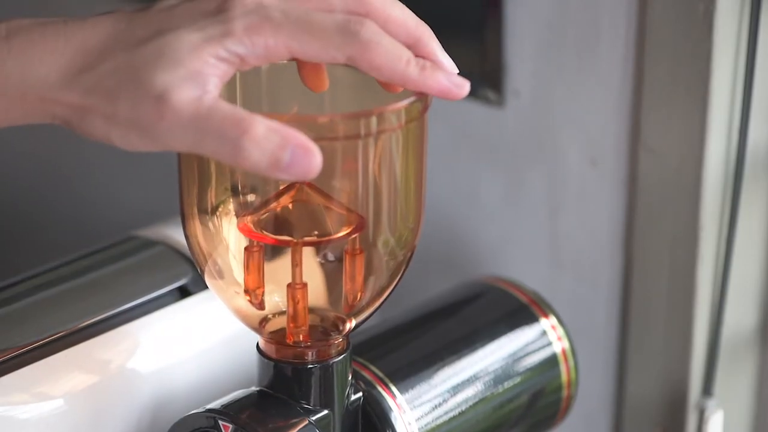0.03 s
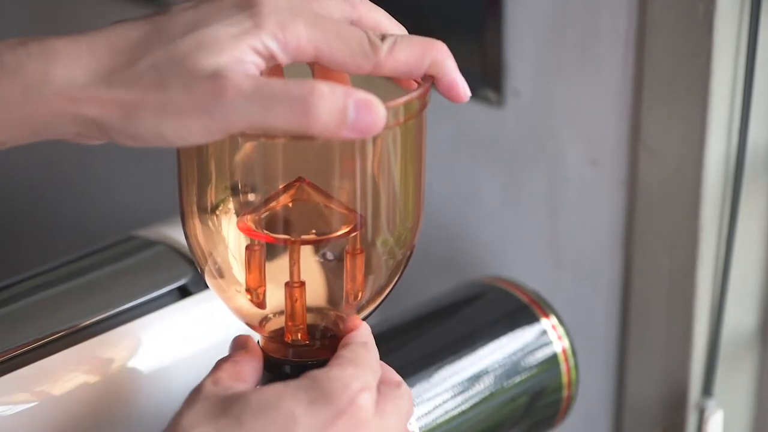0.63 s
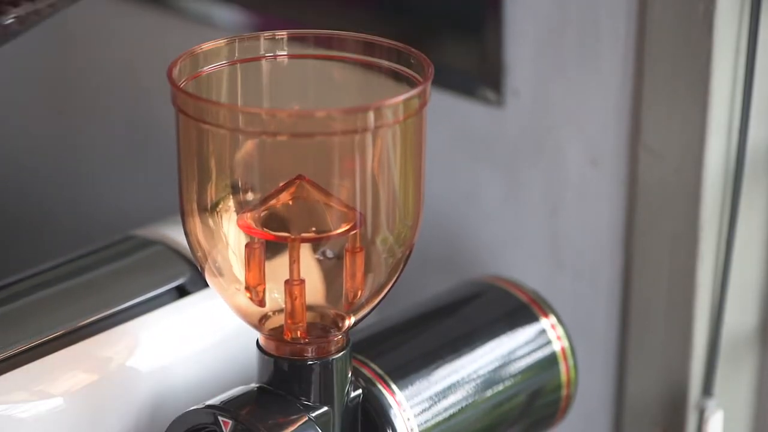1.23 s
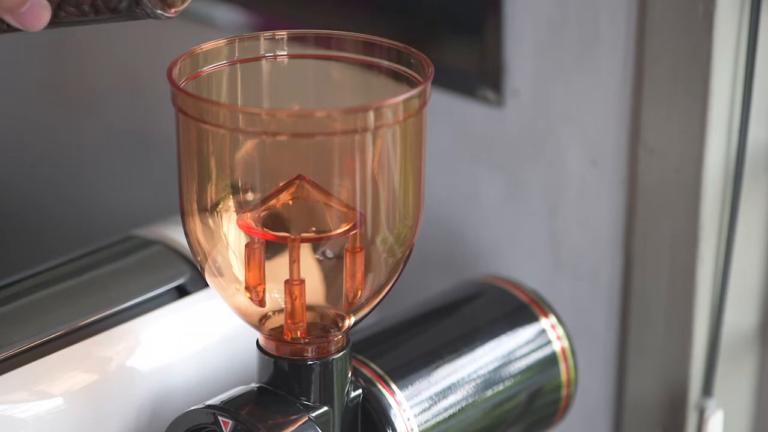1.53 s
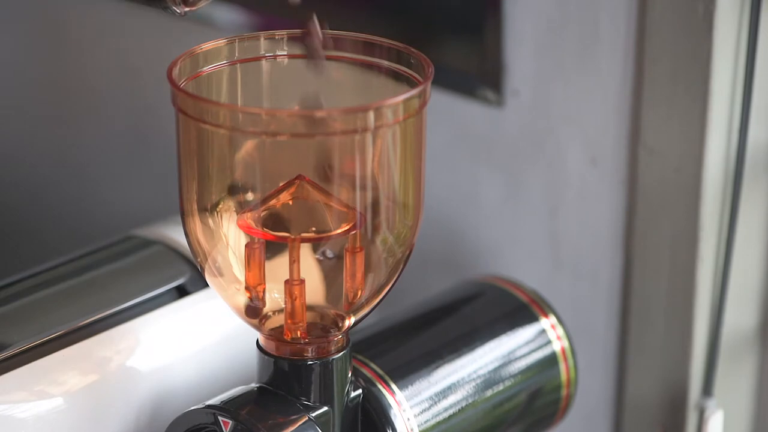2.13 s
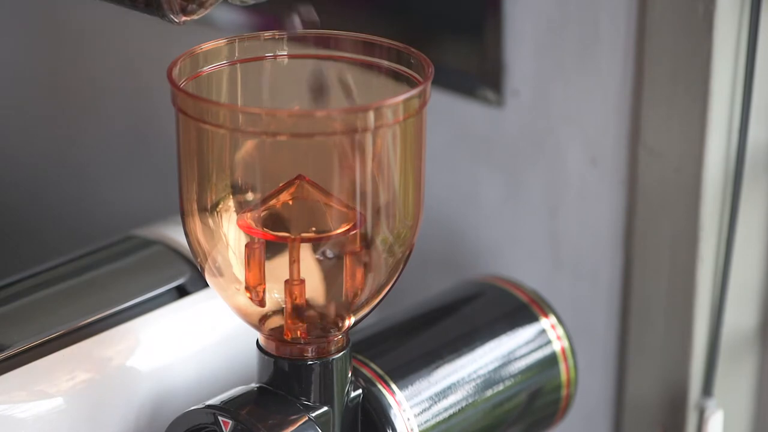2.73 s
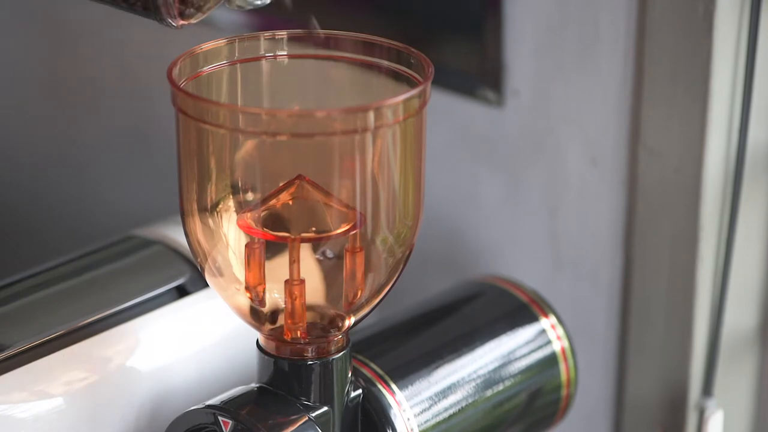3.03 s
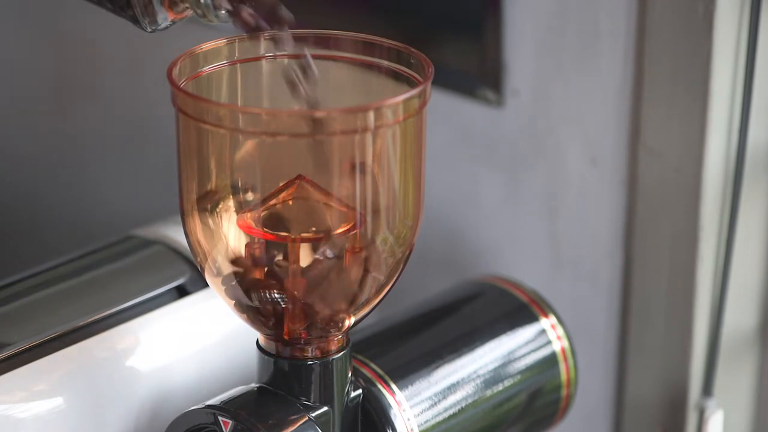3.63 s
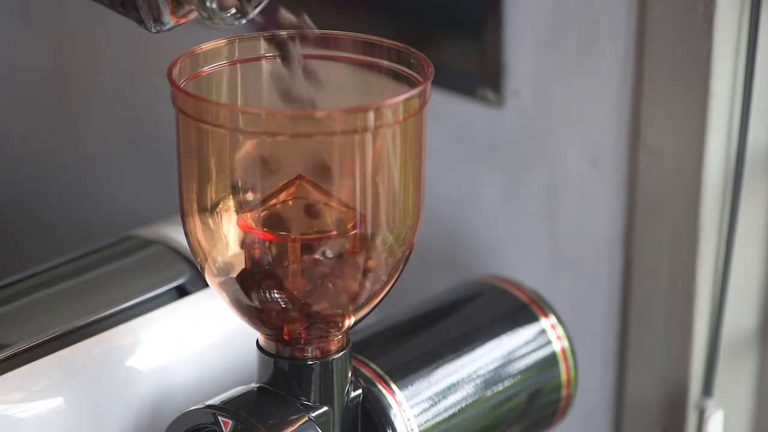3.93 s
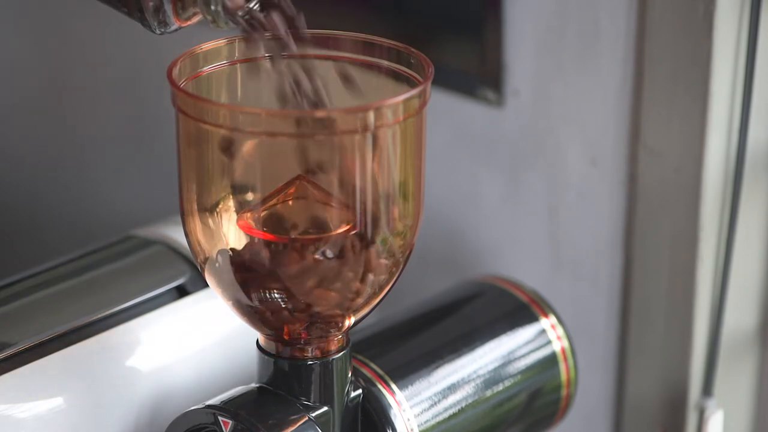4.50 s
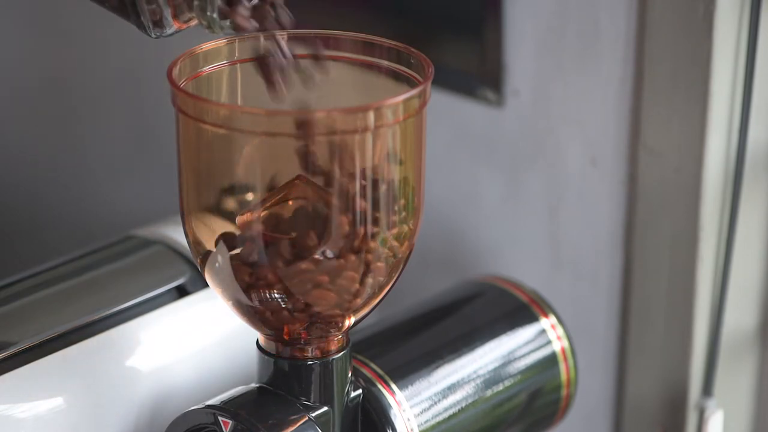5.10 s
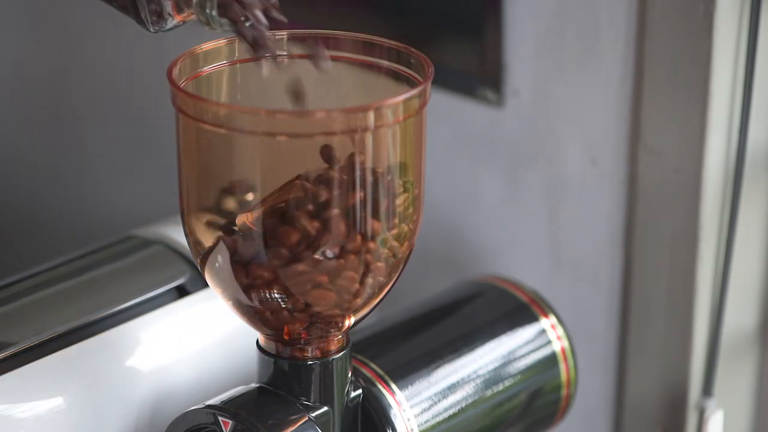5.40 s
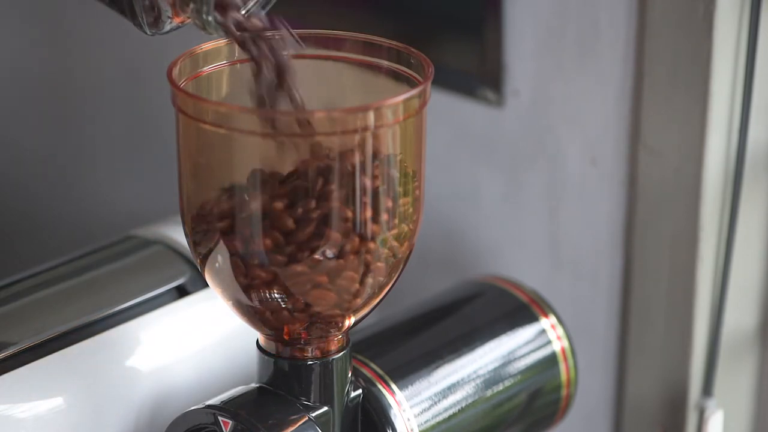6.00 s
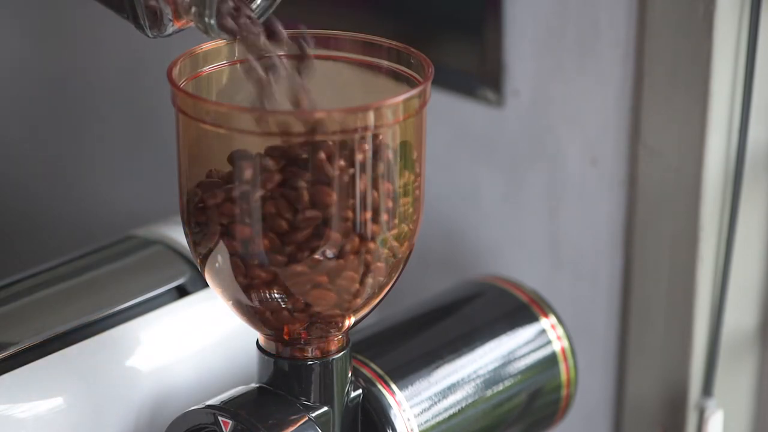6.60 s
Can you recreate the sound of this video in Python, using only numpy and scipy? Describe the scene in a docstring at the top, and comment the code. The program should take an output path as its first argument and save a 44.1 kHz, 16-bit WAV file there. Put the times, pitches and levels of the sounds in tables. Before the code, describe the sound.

After a tap and a few glassy clinks, coffee beans clatter into a plastic grinder hopper, easing to a softer patter.

```python
"""Coffee beans poured into a grinder

Beans slide along a tilted glass jar and pour into a plastic hopper, close by in a small room.
Their impacts first excite the modes of the bare wall; the growing heap damps those modes, and the
beans land softly on each other. Before the pour, hands steady and tap the hopper,
and a low rumble stops short together with a hiss."""
import sys
import numpy as np
from scipy import signal
from scipy.fft import rfft, irfft
from scipy.io import wavfile
from scipy.ndimage import uniform_filter1d

SR = 44100
rng = np.random.default_rng(int(sys.argv[2]) if len(sys.argv) > 2 else 0)


def transcribe(u):
    """Save the signal u as a 16-bit wav file named by the first command-line argument.

    u: samples, shape (n,) or (channels, n), limited to [-1, 1]; the rate is SR.
    q: integer samples, one column per channel.
    """
    v = np.clip(np.atleast_2d(u).T, -1, 1)
    q = np.round(v * 32767).astype(np.int16)
    wavfile.write(sys.argv[1], SR, q)


N = 297675
TIME = np.arange(N) / SR
BEAN_HZ = 5600  # usual pitch of a bean
HISS_END_S = 1.118


def pour(cushion_db=-6, heap_db=2):
    """Energy partition: as the hopper fills, the heap takes a growing share of the blows from the wall."""
    # Flow on a bare wall: a spill, a stall, the main pour. Each row: time in seconds, level in dB.
    flow = [(2.02, -26), (2.11, -30), (2.16, -17.5), (2.82, -17.5), (3.05, -30.5), (3.2, -12), (3.38, -15),
            (3.62, -15.5), (3.71, -19), (3.85, -15.5), (3.96, -26.5), (4.02, -18), (4.35, -16),
            (4.62, -17.5), (4.73, -20.5), (5.07, -19.5), (5.46, -25), (5.6, -21), (5.8, -21), (5.93, -24.5),
            (6.1, -22), (6.57, -27), (6.75, -38)]
    # Spectrum of a bean striking other beans. Each row: frequency in Hz, level in dB.
    on_heap = [(100, -36), (600, -25.5), (1050, -16), (1400, -8), (2000, -4.5), (2500, -6.5), (3100, 1),
               (4000, -3.5), (5000, 0), (6500, 0.5), (8500, -2.5), (10500, -3), (13000, -6.5),
               (16000, -13.5)]
    heap_share = np.interp(TIME, (4.4, 6.37), (0.073, 0.99))
    # beans fall less far and land softer on a full heap
    blows = falling_beans(follow(flow, -120) + cushion_db * heap_share)
    wall = hopper_wall(blows * np.sqrt(1 - heap_share))
    return wall + gain_of(heap_db) * through(blows * np.sqrt(heap_share), click(on_heap))


def hopper_wall(blows, bare_db=-4, buried_db=-5.5, flex_db=-42, click_db=-2):
    """Modal damping: beans resting against the wall widen its resonances and deaden its ring."""
    # Modes of the bare wall, the half-buried wall and the whole hopper flexing on its seat.
    # Each row: frequency in Hz, bandwidth in Hz, level in dB.
    bare_modes = [(1610, 35.4, -0.5), (1973, 61, 2), (2628, 32, -4), (2995, 77, 0.5), (3400, 58, 2.5),
                  (3793, 98, -1), (4220, 160, -4.5), (4480, 56, 2), (4300, 39, -10), (4725, 144, 2.5),
                  (5272, 164, 0.5), (5310, 110, -19), (5620, 44, 3), (5850, 220, -1.5), (5900, 88, -8.5),
                  (6140, 32, 6), (6210, 126, 2), (6450, 18, 3), (6500, 52, -18), (7040, 150, -13.5),
                  (7460, 150, -18)]
    buried_modes = [(1750, 130, -14.5), (1950, 62, 0), (2080, 78, 1), (3020, 16, 7.5), (3720, 77, -1.5),
                    (4320, 90, -21), (4640, 310, -2.5), (5250, 560, -2.5), (5750, 290, -10),
                    (6200, 260, -0.5), (6940, 350, -16), (10100, 170, -33)]
    flex_modes = [(480, 42, 3), (810, 37, -4)]
    # Spectrum of a bean striking plastic. Each row: frequency in Hz, level in dB.
    on_wall = [(100, -42), (500, -25), (1100, -56), (1500, -14), (2400, -26), (3500, -20), (4500, 0.5),
               (6400, -12), (8200, -16.5), (10500, -10.5), (13000, -22.5), (16000, -32)]
    buried = np.interp(TIME, (3.82, 5.24), (0.028, 0.92))
    bare = gain_of(bare_db) * through(blows * (1 - buried), ring(bare_modes, low_hz=1570))
    damped = gain_of(buried_db) * through(blows * buried, ring(buried_modes, low_hz=1320))
    flex = gain_of(flex_db) * through(blows, ring(flex_modes, low_hz=300))
    return bare + damped + flex + gain_of(click_db) * through(blows, click(on_wall))


def falling_beans(flow_db, stream_db=-2, extra_lull_db=-2, hard_lull_db=-4):
    """Granular flow: beans fall in bunches, so the stream thins just before each strong landing."""
    # Single beans that land hard. Each row: start in seconds, relative level in dB, pitch in Hz.
    hard = [(1.9805, -27, 5400), (2.0143, -17, 5240), (2.0277, -20, 5250), (2.0416, -23.5, 6060),
            (2.0774, -19, 5570), (2.11, -17, 4770), (2.1344, -15, 5660), (2.32, -17.5, 5030),
            (2.397, -19, 5540), (2.4348, -17.5, 5800), (2.8335, -15.5, 4700), (2.9327, -17.5, 5850),
            (2.9553, -17, 5310), (2.9692, -20, 6200), (3.0008, -22.5, 6140), (3.0856, -19, 6000),
            (3.1124, -18.5, 6030), (3.2235, -15, 5750), (3.5725, -15.5, 6200), (3.8091, -19.5, 5200),
            (3.9413, -17.5, 5400), (3.9886, -16, 6100), (4.1472, -13.5, 5900), (4.1813, -13.5, 5100),
            (4.6853, -18, 5800), (4.778, -22, 4800), (4.9615, -18, 5200), (5.057, -18.5, 5260),
            (5.078, -25, 4870), (5.1702, -24, 5300), (5.4584, -25.5, 5990), (5.4908, -25, 5600),
            (5.5675, -23, 5000), (5.65, -25, 4870), (5.763, -20, 5010), (5.829, -21, 5900),
            (6.0355, -21.5, 4930), (6.2035, -24.5, 6090), (6.3771, -26, 5810), (6.5315, -28.5, 5760),
            (6.5485, -26.5, 5830), (6.6932, -37.5, 6160)]
    rattle = stream(2, N / SR, spread_db=0, pitch_hz=BEAN_HZ, scatter=0.19, steady_s=0.012, count=3200)
    extra = extra_landings(flow_db)
    flow = gain_of(stream_db + flow_db + extra_lull_db * lulls(extra)) * rattle + landings(extra)
    return flow * gain_of(hard_lull_db * lulls(hard)) + landings(hard)


def beans(s, strength, pitch_hz, ring_db=8, scatter_s=0.0026, scatter_db=-12,
          chatter_s=0.003, rebound=0.87, width_hz=800, size=512, count=3):
    """Contact chatter: each bean touches several times within milliseconds and rings at its own pitch."""
    hz = np.fft.rfftfreq(size, 1 / SR)
    chance = rng.random((len(s), count, 2))
    delay = chatter_s * chance[:, :, 0] * (np.arange(count) > 0)
    force = np.sign(chance[:, :, 1] - .5) * rebound ** np.arange(count)
    contacts = sum(force[:, [k]] * np.exp(-2j * np.pi * hz * delay[:, [k]]) for k in range(count))
    # each bean's sound echoes around the vessel along its own paths
    echoes = rng.standard_normal((len(s), size)) * np.exp(-np.arange(size) / SR / scatter_s)
    paths = 1 + gain_of(scatter_db) * rfft(echoes)
    resonance = 1j * hz * width_hz / (pitch_hz[:, None] ** 2 - hz ** 2 + 1j * hz * width_hz)
    grains = irfft(contacts * paths * (1 + gain_of(ring_db) * resonance), size)
    grains *= (strength / np.linalg.norm(grains, axis=1))[:, None]
    at = np.round(s * SR).astype(int)[:, None] + np.arange(size)
    return np.bincount(at.ravel(), grains.ravel(), N)[:N]


def stream(start, end, spread_db, pitch_hz, scatter, steady_s, count):
    """Shot noise: beans arrive at random, their sum held near rms 1 over the span steady_s."""
    s = start + rng.random(count) * (end - start)
    strength = gain_of(spread_db * np.clip(rng.standard_normal(count), -2, 2))
    rattle = beans(s, strength, pitch_hz * np.exp(scatter * rng.standard_normal(count)))
    span = int(steady_s * SR)
    power = uniform_filter1d(uniform_filter1d(rattle ** 2, span), span)
    return rattle / np.sqrt(abs(power) + np.mean(rattle ** 2) / 20)


def landings(rows, landing_db=23, spray_db=-9, spray_s=0.026, fade_db=12, detune=0.39, count=5):
    """Momentum transfer: a hard landing knocks other beans loose in a short, fading spray."""
    s, db, pitch_hz = np.transpose(rows)
    jitter, pitch_draw = rng.random((len(s), count, 2)).T
    lag = (np.arange(count)[:, None] + .5 + jitter) / count
    spray_hz = pitch_hz * np.exp(detune * (2 * pitch_draw - 1))
    strength = gain_of(db + spray_db - fade_db * lag)
    spray = beans((s + spray_s * lag).ravel(), strength.ravel(), spray_hz.ravel())
    return gain_of(landing_db) * (beans(s, gain_of(db), pitch_hz) + spray)


def extra_landings(flow_db, start=2.15, per_s=36, level_db=-2.5, spread_db=1):
    """Further hard landings at chance times: rows (s, dB, Hz), as hard as the flow is strong."""
    count = int((N / SR - start) * per_s)
    jitter, size, pitch = rng.uniform(-1, 1, (count, 3)).T
    s = start + (np.arange(count) + (1 + jitter) / 2) / per_s
    db = np.interp(s, TIME, flow_db) + level_db + spread_db * size
    return np.transpose([s, db, BEAN_HZ * np.exp(.12 * pitch)])


def lulls(rows, lull_s=0.027):
    """Bunching: how far the stream has thinned (0 to 1) ahead of the next landing."""
    s = np.append(np.sort(np.transpose(rows)[0]), np.inf)
    wait = s[np.searchsorted(s, TIME)] - TIME
    return np.clip(1 - (wait / lull_s) ** 2, 0, 1)


def jar(slide_db=-3, knock_db=9, tick_db=-5):
    """Impact excitation: sliding and knocking beans set the modes of the glass ringing."""
    # Modes of the jar. Each row: frequency in Hz, bandwidth in Hz, level in dB.
    glass_modes = [(4660, 180, 2), (4990, 100, -5), (10000, 1300, -15.5), (11100, 700, -15),
                   (13500, 2600, -23)]
    # Beans shift as the jar tilts. Each row: start and end in seconds, relative level in dB.
    slides = [(1.25, 1.47, -50), (1.69, 1.73, -58), (1.8, 1.89, -51.5)]
    # Single beans strike the glass. Each row: start in seconds, relative level in dB.
    strikes = [(1.26, -39), (1.2879, -30), (1.3765, -29), (1.414, -29), (1.697, -40), (1.7513, -40),
               (1.7808, -34.5), (1.812, -32.5), (1.8292, -28), (1.965, -35)]
    # Spectrum of their contact tick. Each row: frequency in Hz, level in dB.
    on_glass = [(100, -30), (1500, -14), (3000, -10), (5000, -9), (7500, 7), (11000, -6), (16000, -14)]
    sliding = gain_of(slide_db) * strokes(slides, rise_s=0.03, fade_db_per_s=132)
    rattle = stream(0.98, 2, spread_db=4, pitch_hz=6760, scatter=0.39, steady_s=0.035, count=400)
    s, db = np.transpose(strikes)
    knocks = beans(s, gain_of(db + knock_db), pitch_hz=np.full(len(s), 5500.))
    ticks = gain_of(tick_db) * through(knocks, click(on_glass))
    return through(sliding * rattle + knocks, ring(glass_modes, low_hz=2800)) + ticks


def hands(tap_db=7, holding_db=-55.5, fade_s=0.075):
    """Structure-borne sound: a tap on the hopper, and a low rumble as the hands push it; the rumble ends
    abruptly together with the hiss."""
    # The tap of a finger. Each row: start in seconds, relative level in dB, pitch in Hz.
    taps = [(0.7724, -21, 2700)]
    # Hands push the hopper. Each row: start and end in seconds, level in dB.
    pushes = [(0.07, 0.16, -44.5), (0.21, 0.48, -42), (0.7, 0.84, -40.5), (0.87, 0.93, -48)]
    # Spectra of a finger on the plastic rim and of the rumble. Each row: frequency in Hz, level in dB.
    on_rim = [(100, -14), (1500, -1), (2700, 8.5), (3500, -2), (5000, 0), (9000, -15), (16000, -25)]
    rumble = [(15, -20), (33, 7), (70, -7), (110, -22), (300, -52), (1000, -90)]
    s, db, pitch_hz = np.transpose(taps)
    contact = beans(s, gain_of(db + tap_db), pitch_hz, ring_db=0, scatter_s=0.0027)
    fade = np.clip((HISS_END_S - TIME) / fade_s + 1, 0, 1)
    effort = np.hypot(gain_of(holding_db), strokes(pushes, rise_s=0.07, fade_db_per_s=210))
    return through(contact, click(on_rim)) + fade * effort * noise(rumble)


def room(x, count=8):
    """Multipath: beans land at ever new spots, and each spot has its own pattern of echoes."""
    spot = rng.integers(0, count, N)[np.arange(N) // 441]  # drawn every 10 ms
    shares = (uniform_filter1d((spot == k) * 1., 220) for k in range(count))
    return sum(through(x * np.sin(np.pi / 2 * share), reflections()) for share in shares)


def reflections(t60=0.16, first_s=0.004, dull_hz=8000, size=22050):
    """Absorption: sparse echoes from the near walls decay exponentially, their treble dulled."""
    t = np.arange(size) / SR
    echoes = rng.choice([-1., 1.], size) * (rng.random(size) < .1)
    echoes *= (t > first_s) * gain_of(-60 * t / t60)
    echoes = signal.lfilter(*signal.butter(1, dull_hz, fs=SR), echoes)
    return echoes / np.linalg.norm(echoes)


def background(hiss_db=-46, air_db=-54):
    """Noise floor: room air, a hiss that stops short, a low drone and one faint tone superpose."""
    # Spectra of the hiss, the air and the drone. Each row: frequency in Hz, level in dB.
    hiss_colour = [(59, -28), (100, 0), (193, -1.5), (277, 0.5), (335, -4.5), (471, -5), (648, -6.5),
                   (2170, -13), (2630, -10), (3700, -19.5), (4470, -16.5), (6020, -18.5), (11600, -35),
                   (16000, -33)]
    air_colour = [(12, -41), (20, -10.5), (113, -3.5), (446, -10.5), (527, -10), (660, -11), (1190, -14.5),
                  (1290, -10.5), (1710, -16), (2020, -16), (4540, -21), (7950, -26.5), (9140, -32),
                  (16000, -35)]
    drone_colour = [(30, -38), (65, -9), (105, -20), (132, 7), (165, -13.5), (500, -14.5), (1200, -19.5),
                    (4000, -61)]
    # The drone sinks, then grows. Each row: time in seconds, level in dB.
    drone_levels = [(0, -58), (4.3, -68), (4.9, -57.5), (6.75, -54)]
    # A brief thin tone. Each row: time in seconds, level in dB, pitch in Hz.
    tone_path = [(2.76, -78, 873), (2.80, -56, 868), (2.89, -51, 867), (2.94, -69, 865)]
    hiss = gain_of(hiss_db) * noise(hiss_colour) * np.clip((HISS_END_S - TIME) / 0.0036, 0, 1)
    air = gain_of(air_db) * noise(air_colour)
    drone = gain_of(follow(drone_levels, -75)) * noise(drone_colour)
    s, db, hz = np.transpose(tone_path)
    phase = 2 * np.pi * np.cumsum(np.interp(TIME, s, hz)) / SR
    tone = gain_of(np.interp(TIME, s, db, -140, -140)) * np.sin(phase)
    return hiss + air + drone + tone


def ring(modes, low_hz, size=6000):
    """Modal superposition: damped modes, total energy 1; a small shell radiates little under low_hz."""
    t = np.arange(size) / SR
    tone = sum(gain_of(db) * width * np.exp(-np.pi * width * t) * np.cos(2 * np.pi * hz * t)
               for hz, width, db in modes)
    tone[0] /= 2  # the blow is centred on the first sample
    tone = signal.sosfilt(signal.butter(4, low_hz, "high", fs=SR, output="sos"), tone)
    return tone / np.linalg.norm(tone)


def click(points, size=2048):
    """Minimum phase: the sharpest causal pulse with the given spectrum."""
    log_gain = np.log(colour(points, abs(np.fft.fftfreq(size, 1 / SR))))
    spectrum = np.exp(np.conj(signal.hilbert(log_gain)))
    return np.fft.ifft(spectrum).real[:size // 2]


def noise(points):
    """Spectral shaping: white noise filtered to the given spectrum, at rms 1."""
    x = irfft(rfft(rng.standard_normal(N)) * colour(points, np.fft.rfftfreq(N, 1 / SR)), N)
    return x / np.sqrt(np.mean(x ** 2) + 1e-20)


def colour(points, hz):
    """Spectral envelope: gain through points (Hz, dB) on a log-frequency axis."""
    f, db = np.transpose(points)
    return gain_of(np.interp(np.log(hz + 1), np.log(f + 1), db))


def strokes(rows, rise_s, fade_db_per_s):
    """Amplitude envelope: each movement swells, holds and decays exponentially."""
    return sum(np.clip((TIME - start) / rise_s, 0, 1)
               * gain_of(db - fade_db_per_s * np.maximum(TIME - end, 0)) for start, end, db in rows)


def follow(rows, before):
    """Linear interpolation of rows (s, value)."""
    s, value = np.transpose(rows)
    return np.interp(TIME, s, value, left=before)


def through(x, response):
    """Convolution with an impulse response."""
    return signal.oaconvolve(x, response)[:N]


def gain_of(db):
    """Decibels to amplitude."""
    return 10 ** (np.asarray(db) / 20)


def scene(room_db=-10):
    """Superposition of the direct sound, its reflections and the background."""
    close = pour() + jar() + hands()
    return (close + gain_of(room_db) * room(close) + background())[None]


def record(dry, ceiling=0.88, edge_hz=15950):
    """Soft saturation rounds the highest peaks; a low-pass filter then limits the band."""
    rounded = dry / (1 + (dry / ceiling) ** 8) ** (1 / 8)
    low_pass = signal.firwin(511, edge_hz, window=("kaiser", 9), fs=SR)
    return signal.oaconvolve(rounded, low_pass[None], "same")


dry = scene()
out = record(dry)
transcribe(out)
```